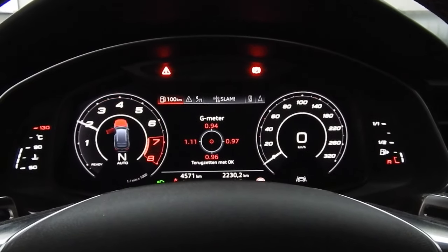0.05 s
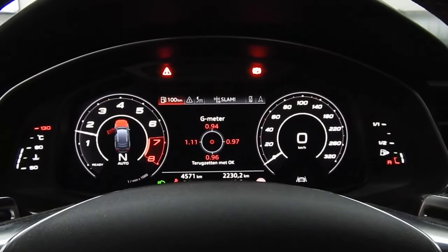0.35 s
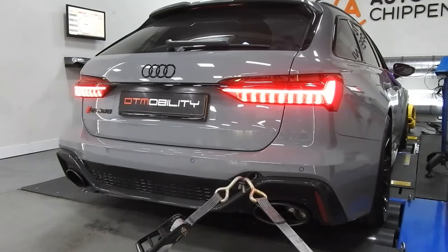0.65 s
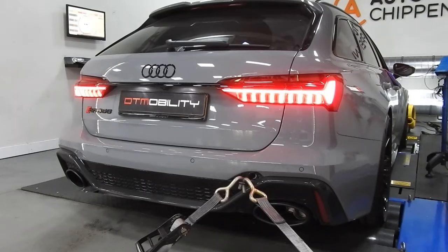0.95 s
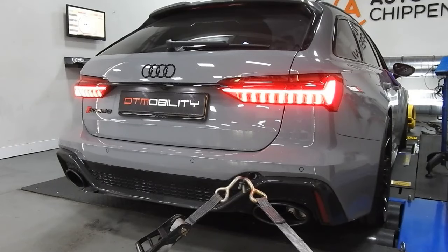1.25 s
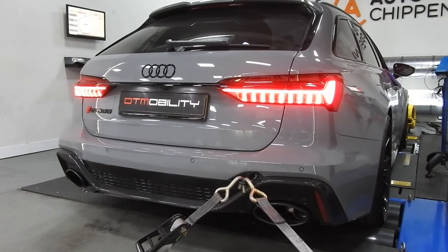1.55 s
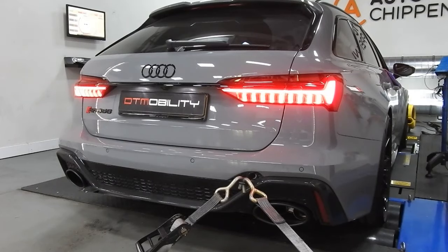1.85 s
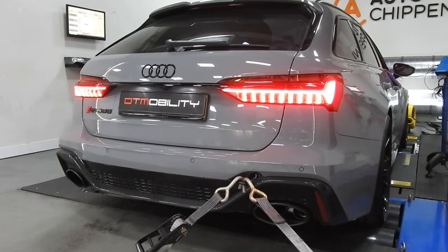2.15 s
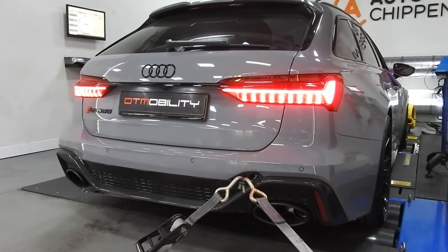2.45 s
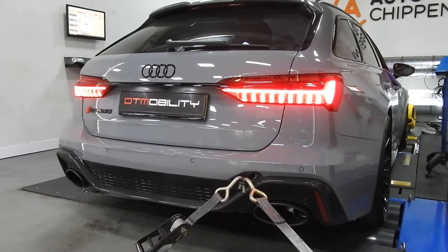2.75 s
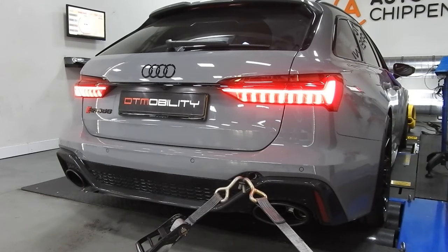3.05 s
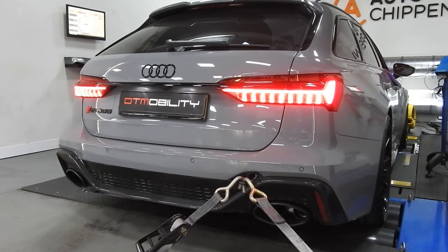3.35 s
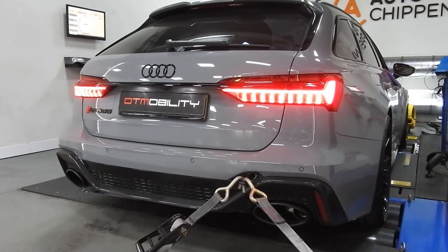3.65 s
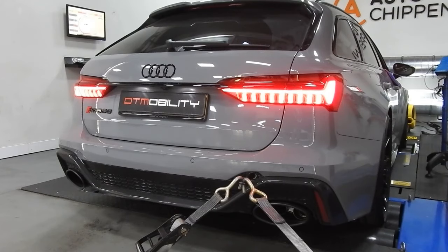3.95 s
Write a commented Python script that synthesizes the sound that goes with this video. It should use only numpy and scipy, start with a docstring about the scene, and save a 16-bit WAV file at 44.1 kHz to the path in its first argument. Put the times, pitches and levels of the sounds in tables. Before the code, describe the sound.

A V8 car engine idles, then revs up and holds, throbbing, with exhaust booms and coughs.

```python
"""A V8 estate car stands in a ventilated workshop. First, from the cabin, the revs sink. At 0.6 s the scene
changes to behind the tailpipes: the engine idles, each firing sending a pulse and a puff of gas down a pipe. At
1.2 s the throttle opens with a thump and the revs climb to the standstill limit, where the fuel is cut and the
exhaust booms and coughs; loud peaks click with overload. From 1.6 s it lopes on the limit as cylinders are cut.
At 3.8 s the pedal is released, with more booms and coughs."""
import sys
import numpy as np
from scipy import signal
from scipy.fft import rfft, irfft, next_fast_len
from scipy.io import wavfile
from scipy.ndimage import map_coordinates

SR = 44100
rng = np.random.default_rng(int(sys.argv[2]) if len(sys.argv) > 2 else 0)


def master_out(mix):
    """Clip the mix to full scale and print it as 16-bit PCM to the path in sys.argv[1]."""
    frames = np.transpose(np.atleast_2d(mix))
    ceiling = np.clip(frames, -1, 1)
    pcm = np.round(ceiling * 32767).astype(np.int16)
    wavfile.write(sys.argv[1], SR, pcm)


N = 176400
CYLINDERS = 8
OUTSIDE_S = .612  # scene changes from cabin to tailpipes
THROTTLE_S, LIMIT_S, CHANGE_S = 1.3, 1.808, .16  # centres and length of the tone crossfades


def amp(db):
    """dB to gain."""
    return np.exp(np.asarray(db) * (np.log(10) / 20))


def unit(x):
    """Scale to rms 1."""
    return x / np.sqrt(np.mean(x ** 2) + 1e-20)


def along(points, hz):
    """Interpolate (f/Hz, value) rows on a log axis."""
    f, v = np.transpose(points)
    return np.interp(np.log(hz + 1), np.log(f + 1), v)


def clock():
    """t/s per sample."""
    return np.arange(N) / SR


def curve(rows):
    """Interpolate (t/s, value) rows per sample."""
    return np.interp(clock(), *np.transpose(rows))


def ramp(centre_s, length_s):
    """Linear rise from 0 to 1."""
    return np.clip((clock() - centre_s) / length_s + .5, 0, 1)


def swells(rows):
    """Sum of Gaussian envelopes."""
    return sum(amp(db) * np.exp(-.5 * ((clock() - s) / sigma_s) ** 2) for s, db, sigma_s in rows)


def wobble(knots_per_s):
    """Smooth random curve, rms about 1."""
    coarse = np.arange(0, N + 64, 64)
    knots = rng.standard_normal(int(N * knots_per_s / SR) + 4)
    return np.interp(np.arange(N), coarse, map_coordinates(knots, [coarse * knots_per_s / SR]))


def filtered(x, response):
    """Zero-phase filter with gain response(hz)."""
    size = next_fast_len(N + SR // 2)
    return irfft(rfft(x, size) * response(np.fft.rfftfreq(size, 1 / SR)), size)[..., :N]


def spread(pair, spectrum, coherence):
    """Two unrelated signals to coloured stereo, rms 1."""
    def response(hz):
        angle = np.arccos(np.clip(along(coherence, hz), -1, 1)) / 2
        return amp(along(spectrum, hz)) * np.array([np.cos(angle), np.sin(angle)])
    mid, side = filtered(pair, response)
    return unit(np.array([mid + side, mid - side]))


def noise(spectrum, coherence):
    """Coloured stereo noise, rms 1."""
    return spread(rng.standard_normal((2, N)), spectrum, coherence)


def workshop(x, t60_s=.3, tail_db=8):
    """Hall reverb. Row 0: direct sound plus tail; row 1: an unrelated tail."""
    t = np.arange(SR // 3) / SR
    impulse = rng.standard_normal((2, len(t))) * amp(-60 * t / t60_s)
    impulse *= amp(tail_db) / np.linalg.norm(impulse[0])
    impulse[0, 0] += 1
    return unit(signal.fftconvolve(x[None], impulse, axes=1)[:, :N])


# Air envelope: t/s, relative level/dB
AIR_DB = [(0.63, -38.5), (1.0, -36), (1.23, -34), (1.28, -38), (1.46, -34), (1.6, -37), (1.7, -39.5),
          (1.82, -44), (2.15, -43), (2.4, -41), (3.8, -40), (3.86, -44)]
# Air spectrum: f/Hz, level/dB
AIR_SPECTRUM = [(900, -22), (2100, -6.5), (3700, -8.5), (7600, -15.5), (9700, -15.5), (11500, -30),
                (14000, -52)]
# Hiss width: f/Hz, L-R coherence
AIR_COHERENCE = [(1000, 0.84), (2000, 0.4), (4000, 0.71), (8000, 0.077)]
def air(gain_db=-2):
    """Hiss of fans and intake."""
    return amp(curve(AIR_DB) + gain_db) * noise(AIR_SPECTRUM, AIR_COHERENCE)


# Cabin spectrum: f/Hz, level/dB
CABIN_SPECTRUM = [(20, -34), (50, -21), (80, -4), (130, -13.5), (200, -14), (290, -21.5), (370, -26),
                  (470, -23), (800, -33), (1020, -25), (1400, -33), (2200, -38), (4500, -46.5),
                  (9500, -53.5), (13000, -72)]
# Cabin width: f/Hz, L-R coherence
CABIN_COHERENCE = [(100, 0.97), (1000, 0.93), (4000, .5), (9000, 0.1)]
def cabin(level_db=-27):
    """Muffled noise inside the car."""
    return amp(level_db) * noise(CABIN_SPECTRUM, CABIN_COHERENCE)


# Overload clicks: t/s, peak level/dB
CLICK_EVENTS = [(1.244, -14), (1.479, -11), (1.539, -10), (1.588, -12), (1.613, -11), (3.833, -14)]
def overload_clicks(tau_s=.00022):
    """Sharp clicks of overload distortion, placed at loud peaks."""
    return sum(amp(db) * np.exp(-np.abs(clock() - s) / tau_s) for s, db in CLICK_EVENTS)


# Gas spits: t/s, level/dB, sigma/s
SPIT_EVENTS = [(1.228, -32, 0.0076), (1.576, -30.5, 0.0045), (1.6, -30.5, .014), (1.636, -36.5, 0.012)]
# Spit spectrum: f/Hz, level/dB
SPIT_SPECTRUM = [(800, -6), (2200, 11.5), (4500, 0.5), (9800, -1), (13000, -24)]
def spits(crackle_db=2.2, crackle_per_s=450):
    """Gas sputters as the throttle snaps open and as the fuel is cut."""
    sputter = noise(SPIT_SPECTRUM, AIR_COHERENCE) * amp(crackle_db * wobble(crackle_per_s))
    return swells(SPIT_EVENTS) * unit(sputter)


# Afterfire coughs: t/s, level/dB, sigma/s
COUGH_EVENTS = [(1.342, -18.5, .004), (1.582, -17.5, .017), (3.812, -22.5, .004), (3.831, -18.5, .005),
                (3.88, -22, .004)]
# Cough spectrum: f/Hz, level/dB
COUGH_SPECTRUM = [(120, -8), (330, 5), (870, -4), (1700, -25), (8000, -61)]
# Exhaust width: f/Hz, L-R coherence
PIPE_COHERENCE = [(200, 1), (1000, 0.92), (2500, 0.9), (5000, 0.82)]
def coughs():
    """Hollow bursts of afterfire in the pipe."""
    return swells(COUGH_EVENTS) * noise(COUGH_SPECTRUM, PIPE_COHERENCE)


# Exhaust booms: t/s, length/s, f/Hz, level/dB
BOOM_EVENTS = [(1.218, 0.025, 70.4, -9), (1.583, 0.09, 105.9, -8), (1.707, .045, 112.1, -10.5),
               (1.778, 0.047, 106.8, -13), (3.812, 0.048, 101, -8.5), (3.875, 0.067, 74.5, -15.5),
               (3.965, .05, 112.8, -11)]
def booms(attack_s=.0065, release_s=.017):
    """Unburnt charge excites the exhaust's lowest resonance."""
    out = np.zeros(N)
    for start_s, length_s, hz, db in BOOM_EVENTS:
        t = np.maximum(clock() - start_s, 0)
        envelope = np.minimum(t / attack_s, 1) * np.exp(-np.maximum(t - length_s, 0) / release_s)
        out += np.sqrt(2) * amp(db) * envelope * np.sin(2 * np.pi * hz * t)
    return out


# Firing rate: t/s, f/Hz
FIRING_HZ = [(0, 146), (.1, 126), (.2, 107), (.3, 91), (.6, 84), (.62, 54), (1.16, 54), (1.24, 69),
             (1.31, 104), (1.38, 129), (1.45, 166), (1.52, 200), (1.59, 218), (1.85, 215), (2.1, 218.2),
             (3.79, 218.2), (4, 196)]
def firings(zero_s=2.085):
    """Engine phase, counted in firings from zero_s."""
    fired = np.cumsum(curve(FIRING_HZ)) / SR
    return fired - np.interp(zero_s, clock(), fired)


# Bank (0 near, 1 far) of each cylinder in firing order
CYLINDER_BANK = [0, 1, 0, 0, 1, 0, 1, 1]
def pulses(fired, held, cut_s=1.51, starved_db=-14, far_db=-2, jitter_s=.00003):
    """One pulse per firing, the banks taking uneven turns; the limiter starves half the cylinders."""
    at = np.flatnonzero(np.diff(np.floor(fired)))
    cylinder = np.floor(fired[at]).astype(int) % CYLINDERS
    bank = np.array(CYLINDER_BANK)[cylinder]
    scatter, jitter = rng.standard_normal((len(at), 2)).T
    scatter_db = np.interp(held[at], [0, 1], [3, 1.3])  # steadier on the limit
    starved = (at > cut_s * SR) * (cylinder >= CYLINDERS // 2)
    size = amp(starved_db * starved + scatter_db * scatter) / np.sqrt(curve(FIRING_HZ)[at])
    onset = np.clip(at + np.round(jitter_s * SR * jitter).astype(int), 0, N - 1)
    near, far = [workshop(np.bincount(onset, size * (bank == side), N)) for side in range(2)]
    return unit(near + amp(far_db) * far)


# Bark envelope: t/s, level/dB
BARK_DB = [(.63, -26.5), (1.0, -24), (1.18, -21), (1.31, -23.5), (1.39, -16.5), (1.47, -14.5), (1.5, -17.5),
           (1.535, -13.5), (1.605, -15.5), (1.67, -26), (1.8, -32), (2.2, -29), (3.79, -29), (3.86, -34.5),
           (4, -30)]
# Turbulence, highest on the overrun: t/s, power share
TURBULENT_SHARE = [(1.2, .85), (1.38, .55), (1.55, .45), (1.64, .95), (1.85, .8), (2.2, .5), (3.76, .5),
                   (3.82, .85)]
# Pipe spectra at idle, under throttle, on the limit: f/Hz, level/dB
IDLE_SPECTRUM = [(45, -39), (80, -17), (150, -9.5), (235, -1), (272, -14.5), (299, 9), (325, -9), (364, -2),
                 (420, -14), (600, -6), (800, -14.5), (1100, -14), (3200, -25), (6000, -79)]
THROTTLE_SPECTRUM = [(90, -14), (200, -1), (340, 3), (500, 1), (660, 1), (900, -10), (1220, -3.5),
                     (1450, -13), (1650, -10), (2000, -19.5), (5000, -46), (9000, -84)]
LIMIT_SPECTRUM = [(90, -40), (170, -9), (220, -6.5), (300, 1), (350, 0), (430, -6.5), (720, -1.5),
                  (880, -10), (1130, -8.5), (1500, -12.5), (2200, -19), (4000, -34.5), (8000, -100)]
# Gas-flow rumble: f/Hz, level/dB
RUMBLE_SPECTRUM = [(20, -37), (40, -6), (60, 10.5), (120, 9), (250, -2), (1500, -110)]
def bark(fired, puff_depth=.21, idle_rumble_db=-4.5):
    """Firing pulses and turbulent puffs, coloured by the pipes, over the rumble of the gas flow."""
    opened, held = ramp(THROTTLE_S, CHANGE_S), ramp(LIMIT_S, CHANGE_S)
    pulse_train = pulses(fired, held)
    puffs = unit(rng.standard_normal((2, N)) * (1 + puff_depth * np.cos(2 * np.pi * fired)))
    share = curve(TURBULENT_SHARE)
    gas = np.sqrt(1 - share) * pulse_train + np.sqrt(share) * puffs
    states = [(1 - opened, IDLE_SPECTRUM), (opened * (1 - held), THROTTLE_SPECTRUM),
              (held, LIMIT_SPECTRUM)]
    pipe = sum(np.sqrt(weight) * spread(gas, spectrum, PIPE_COHERENCE) for weight, spectrum in states)
    rumble = amp(idle_rumble_db) * (1 - .22 * opened) * noise(RUMBLE_SPECTRUM, PIPE_COHERENCE)
    return amp(curve(BARK_DB)) * (pipe + rumble)


# Firing fundamental: t/s, level/dB
NOTE_DB = [(0, -25.5), (.12, -39), (.2, -23.5), (.37, -27), (.55, -34.5), (.66, -31), (1.21, -29),
           (1.28, -23), (1.31, -18.5), (1.35, -12.5), (1.4, -19.5), (1.48, -14.5), (1.51, -28), (1.75, -38)]
def firing_note(fired, octave_idle_db=1, octave_rev_db=-16, waver_db=2):
    """Tone at the firing rate plus its octave; fades out on the limit."""
    idling = ramp(OUTSIDE_S, .009) * (1 - ramp(1.17, .054))
    octave_db = octave_rev_db + idling * (octave_idle_db - octave_rev_db) + waver_db * wobble(17.5)
    tone = np.cos(2 * np.pi * fired) + amp(octave_db) * np.sin(4 * np.pi * fired)
    envelope = amp(curve(NOTE_DB) + waver_db * wobble(25.8)) * (1 - ramp(LIMIT_S, CHANGE_S))
    return np.sqrt(2) * tone * envelope


# Lope envelope: t/s, level/dB
LOPE_DB = [(1.6, -18.5), (1.95, -18.5), (2.6, -16.5), (3.2, -16.5), (3.76, -15), (3.84, -18)]
# Lope partials: multiple of the cycle rate, relative level/dB
LOPE_PARTIALS = [(2, -29), (3, 5), (4, 2), (5, 3), (6, -20), (7, -13.5), (8, -19.5), (11, -10.5),
                 (13, -15.5), (15, -20), (16, -22), (17, -15.5), (18, -17.5), (19, -14), (21, -16.5),
                 (25, -17), (26, -19), (27, -23.5), (28, -24), (38, -22), (39, -24), (40, -26), (42, -27),
                 (48, -25.5), (62, -27.5), (68, -31.5), (79, -30.5), (85, -34.5)]
def lope(fired, split_hz=150, low_waver_db=.5, upper_waver_db=1.85, upper_gain_db=2, drift_rad=.2):
    """With cylinders cut, the pipe throbs once per engine cycle; the hall scrambles upper partials."""
    out = np.zeros(N)
    limit_cycle_hz = np.max(curve(FIRING_HZ)) / CYLINDERS
    cycle_rad = 2 * np.pi * (fired / CYLINDERS % 1)
    for order, db in LOPE_PARTIALS:
        if order * limit_cycle_hz < split_hz:
            out -= amp(db + low_waver_db * wobble(7.6)) * np.cos(order * cycle_rad)
        else:
            phase = order * cycle_rad + 2 * np.pi * rng.random() + drift_rad * wobble(12)
            out += amp(db + upper_gain_db + upper_waver_db * wobble(9)) * np.cos(phase)
    return unit(out) * amp(curve(LOPE_DB)) * ramp(LOPE_DB[0][0], .033)


# Balance, left over right: f/Hz, level/dB
BALANCE_DB = [(250, 3.5), (1400, 2), (9000, 0.5)]
def scene():
    """Cabin, then tailpipes; the firing note sounds in both. Left is louder."""
    fired, outside = firings(), ramp(OUTSIDE_S, .0066)
    behind = bark(fired) + spits() + air() + lope(fired) + booms() + coughs() + overload_clicks()
    mix = firing_note(fired) + outside * behind + (1 - outside) * cabin()
    return filtered(mix, lambda hz: amp(along(BALANCE_DB, hz) * np.array([[.5], [-.5]])))


def record(dry):
    """Clip at full scale, then low-pass."""
    cutoff_hz = 15870
    return filtered(np.clip(dry, -1, 1), lambda hz: hz < cutoff_hz)


dry = scene()
out = record(dry)
master_out(out)
```